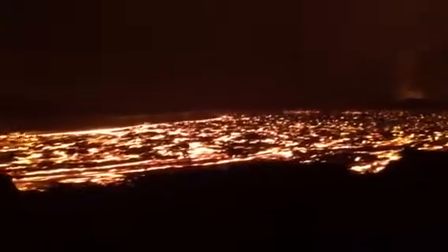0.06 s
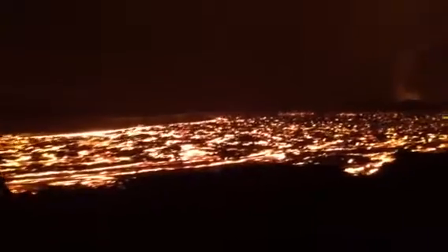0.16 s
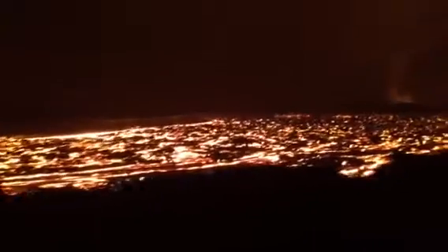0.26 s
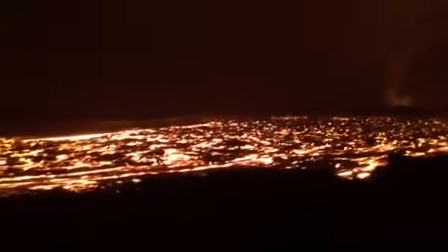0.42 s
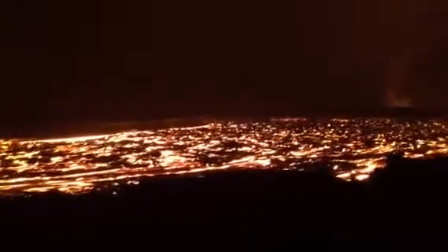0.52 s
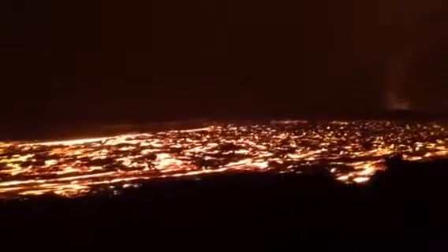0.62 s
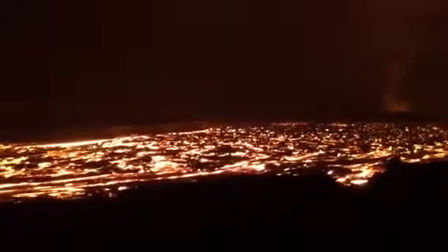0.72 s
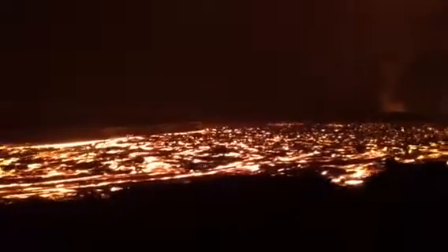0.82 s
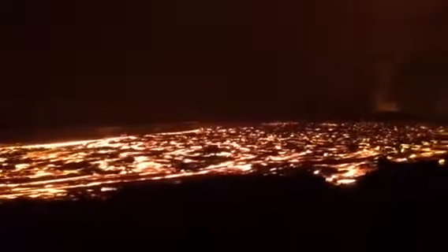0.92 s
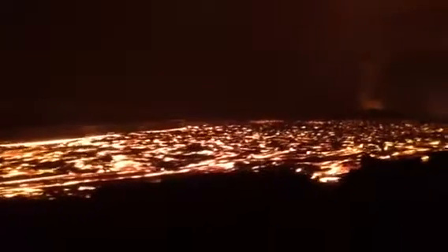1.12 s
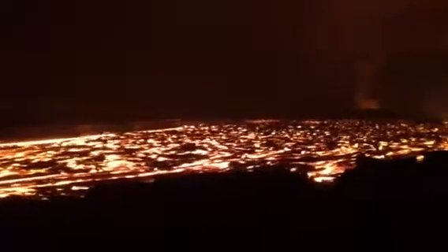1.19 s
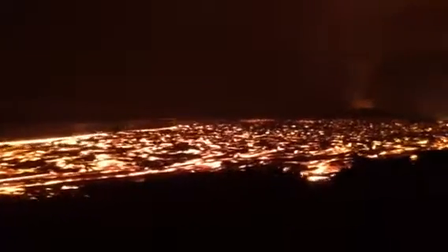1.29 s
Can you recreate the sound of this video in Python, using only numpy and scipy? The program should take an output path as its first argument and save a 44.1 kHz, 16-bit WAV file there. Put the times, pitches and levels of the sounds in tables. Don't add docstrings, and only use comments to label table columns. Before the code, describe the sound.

Wind gust thumps and flutters on a small bare microphone over a distant lava flow's steady hiss

```python
import sys
import numpy as np
from scipy import signal
from scipy.fft import rfft, irfft, next_fast_len
from scipy.io import wavfile
from scipy.ndimage import uniform_filter1d

SR = 44100
rng = np.random.default_rng(int(sys.argv[2]) if len(sys.argv) > 2 else 0)


def store_pcm(level_fs):
    pcm = np.round(np.clip(level_fs, -1, 1) * 32767).astype(np.int16)
    wavfile.write(sys.argv[1], SR, np.atleast_2d(pcm).T)


def gain_from_decibels(decibels):
    exponent = np.asarray(decibels, float) / 20
    return 10 ** exponent


N = 59535


def unit(x):
    return x / np.sqrt(np.mean(x ** 2, axis=-1, keepdims=True) + 1e-20)


def filtered(x, response):
    n = x.shape[-1]
    m = next_fast_len(n + 8192)
    f = np.fft.rfftfreq(m, 1 / SR) + 1
    return irfft(rfft(x, m) * response(f), m)[..., :n]


def puffs(table, below, above):
    start, length, db, hz = np.transpose(table)[:, :, None, None]
    span = 2 ** (np.arange(-6, 6) / 3)
    reach = SR // 10
    t = np.arange(-reach, reach) / SR
    chance = rng.standard_normal((len(start), 4, len(span), 1))
    late, tune, size, turn = chance.transpose(1, 0, 2, 3)

    ratio = span[:, None] * (1 + 0.04 * tune)
    colour = (ratio * np.exp((1 - ratio ** above) / above)) ** below
    gain = gain_from_decibels(1.5 * size) * colour
    scatter = 0.15 * np.tanh(late) / 2
    swell = np.cos(np.pi * np.clip(t / (2 * length) - scatter, -.5, .5)) ** 2
    ripples = gain * swell * np.cos(2 * np.pi * (hz * ratio * t + turn))

    swell_rms = np.sqrt(np.mean(swell[:, 0] ** 2, axis=1, keepdims=True))
    rows = gain_from_decibels(db[:, 0]) * unit(ripples.sum(axis=1)) * swell_rms
    margin = SR // 2
    at = np.round(start[:, 0] * SR).astype(int) + np.arange(len(t)) + margin - reach
    return np.bincount(at.ravel(), rows.ravel(), N + SR)[margin:][:N]


# t/s, length/s, level/dB, peak f/Hz
EDDIES = [(.004, 0.022, -52, 62), (.09, 0.075, -61, 64.2), (.168, 0.022, -51, 75), (.213, 0.016, -73, 74),
          (.242, 0.022, -37, 74), (.268, 0.025, -36, 73.6), (.302, 0.023, -39, 77), (.33, 0.04, -38, 121),
          (.366, 0.023, -32.5, 133), (.387, 0.021, -30.5, 142.2), (.403, 0.03, -42, 95.4),
          (.424, 0.022, -31.5, 119.8), (.466, 0.019, -32, 146), (.479, 0.047, -37.5, 68.7),
          (.512, 0.012, -46, 81.5), (.537, 0.037, -39, 74.2), (.562, .03, -45.5, 49),
          (.61, 0.045, -58.5, 55), (.724, 0.021, -42, 78), (.775, 0.061, -59, 87), (.8, 0.066, -50.5, 42),
          (1.045, 0.03, -48, 55), (1.088, 0.043, -40.5, 70.6), (1.19, 0.056, -55, 91.6),
          (1.262, 0.065, -51, 64), (1.3, 0.07, -70, 71.6), (1.225, 0.082, -70, 61.4), (.92, .06, -67, 55),
          (.345, 0.04, -35, 62), (.38, 0.022, -40.5, 76)]


def thumps():
    return puffs(EDDIES, below=2.1, above=2.1)


# t/s, length/s, level/dB, f/Hz
FLUTTERS = [(.125, 0.017, -62, 230), (.205, 0.018, -63.5, 351), (.262, 0.015, -40.5, 192.6),
            (.325, 0.038, -52, 315), (.355, 0.014, -47.5, 356), (.375, 0.047, -41, 210),
            (.39, 0.021, -39.5, 309), (.405, 0.018, -56.5, 694), (.43, 0.032, -61, 640),
            (.422, 0.025, -50.5, 392), (.467, 0.019, -47.5, 375), (.6, 0.14, -67, 101),
            (.675, 0.015, -57.5, 166), (.79, 0.049, -62, 188.4), (.85, 0.045, -62, 175),
            (.9, 0.022, -59, 188), (.945, 0.01, -54.5, 293), (.972, 0.031, -53, 172),
            (1.022, 0.02, -58, 219), (1.225, 0.035, -61, 354.5), (1.28, 0.09, -65, 170),
            (1.07, 0.051, -61.5, 189), (1.12, 0.034, -64, 175), (.5, 0.02, -54, 194)]


def flutters():
    return puffs(FLUTTERS, below=15, above=2.1)


def patches(x, depth_db, bins, frames):
    z = signal.stft(x, nperseg=512)[2]
    field = uniform_filter1d(rng.standard_normal(z.shape), bins, axis=0)
    field = uniform_filter1d(field, frames, axis=1)
    return signal.istft(z * gain_from_decibels(depth_db * field / field.std()), nperseg=512)[1][:N]


# t/s, level/dB
FLOW = [
    (0.0, -61.5),
    (0.018, -65.5),
    (0.382, -64.5),
    (0.398, -63),
    (0.578, -65.5),
    (1.286, -62.5),
    (1.35, -64.5),
]
# f/Hz, level per Hz/dB
HISS = [(20, -12), (100, 10.5), (400, 1.5), (900, -2.5), (2000, -5.5), (6500, -9), (11500, -11),
        (15700, -19)]
# f/Hz, width/Hz, level/dB
HOUSING = [(2210, 670, -1.5), (2800, 140, 2), (4860, 990, -3), (7700, 590, -2.5), (10520, 1150, -4)]


def flow():
    s, db = np.transpose(FLOW)
    hz, level_db = np.transpose(HISS)

    def colour(f):
        hiss_db = np.interp(np.log(f), np.log(hz), level_db)
        housing_db = sum(g * np.exp(-(2 * (f - c) / w) ** 2) for c, w, g in HOUSING)
        return gain_from_decibels(hiss_db + housing_db)

    broad = patches(rng.standard_normal(N), depth_db=0.8, bins=40, frames=6)
    noise = patches(broad, depth_db=1.3, bins=3, frames=10)
    hiss = filtered(noise, colour)
    upper = filtered(hiss, lambda f: (f > 1000) & (f < 15500))
    return gain_from_decibels(np.interp(np.arange(N) / SR, s, db)) * hiss / upper.std()


# t/s, peak level/dB, 60 dB decay/s, f/Hz
CRACKLES = [
    (.8115, -56, .012, 13000),
    (.44, -67, .1, 11500),
]


def crust():
    out = np.zeros(N + SR)
    t = np.arange(SR // 10) / SR
    for s, db, t60, hz in CRACKLES:
        width = 0.41
        noise = filtered(rng.standard_normal(len(t)),
                         lambda f: 0.64 + np.exp(-((f / hz - 1) / width) ** 2))
        out[round(s * SR):][:len(t)] += gain_from_decibels(db - 60 * t / t60) * unit(noise)
    return out[:N]


# t/s, length/s, level/dB, f/Hz
WHISTLES = [
    (.27, .09, -76.5, 2764),
    (.4, 0.033, -72, 2216),
    (.555, 0.018, -72, 2800),
    (.78, 0.014, -67, 1350),
    (.97, 0.021, -69, 1724),
    (1.2, 0.041, -72.5, 2800),
    (1.3, 0.061, -75, 1617),
    (.165, 0.035, -71.5, 946),
]


def vents():
    return puffs(WHISTLES, below=40, above=2.1)


def scene():
    return (thumps() + flutters() + flow() + crust() + vents())[None]


def top_cut(x):
    return signal.sosfilt(signal.butter(12, 15670, fs=SR, output="sos"), x)


def record(dry):
    port_hz, port_slope, top_hz = 55, 1.22, 15800
    mix = filtered(dry, lambda f: (f < top_hz) / np.sqrt(1 + (port_hz / f) ** (2 * port_slope)))
    return top_cut(mix)


dry = scene()
out = record(dry)
store_pcm(out)
```